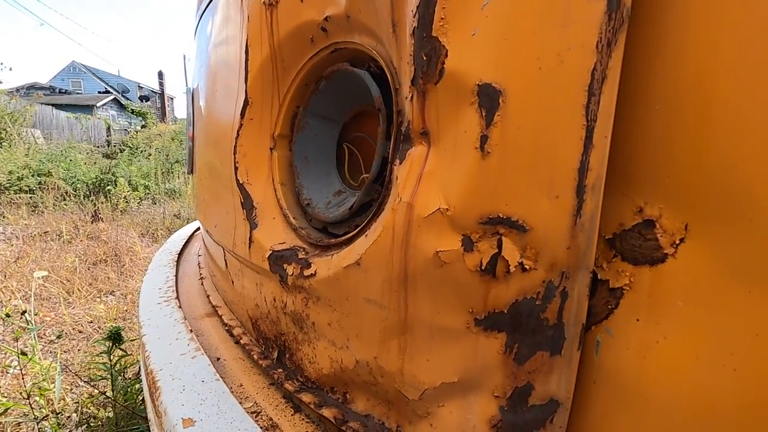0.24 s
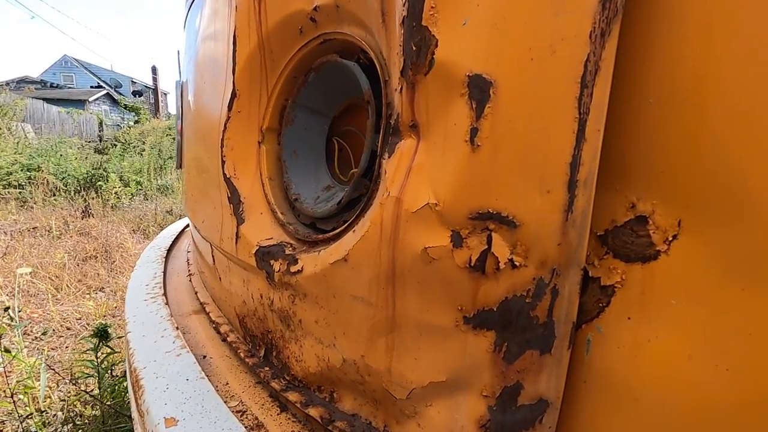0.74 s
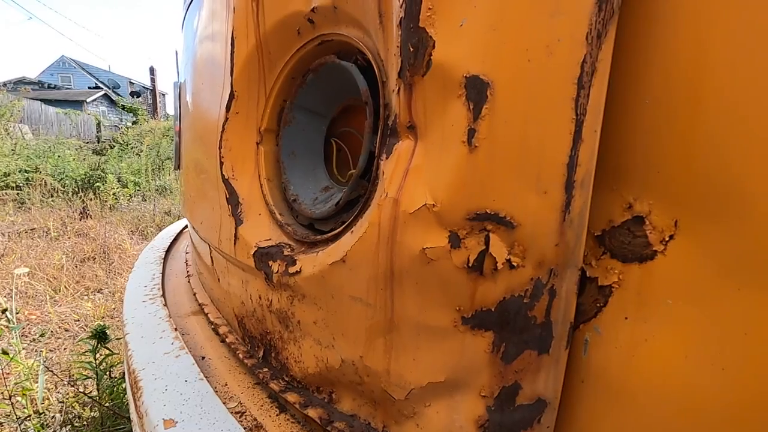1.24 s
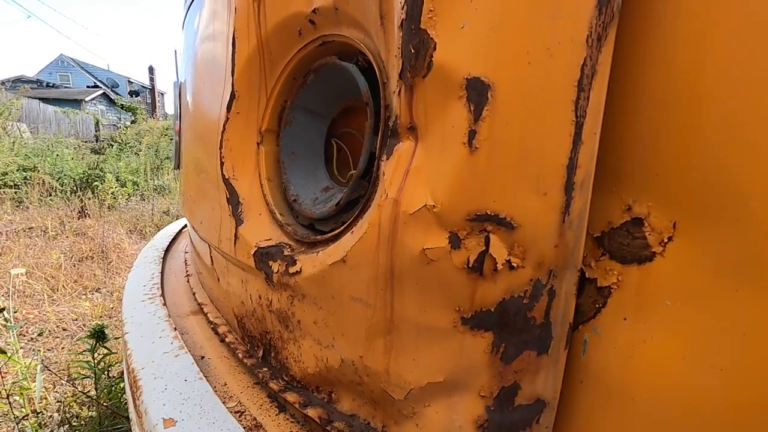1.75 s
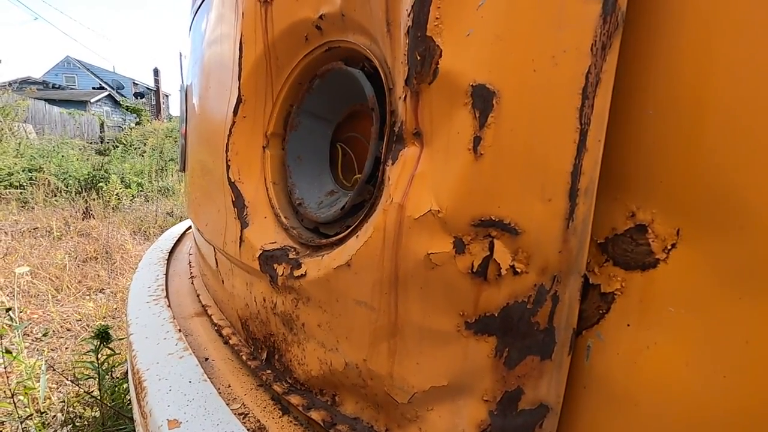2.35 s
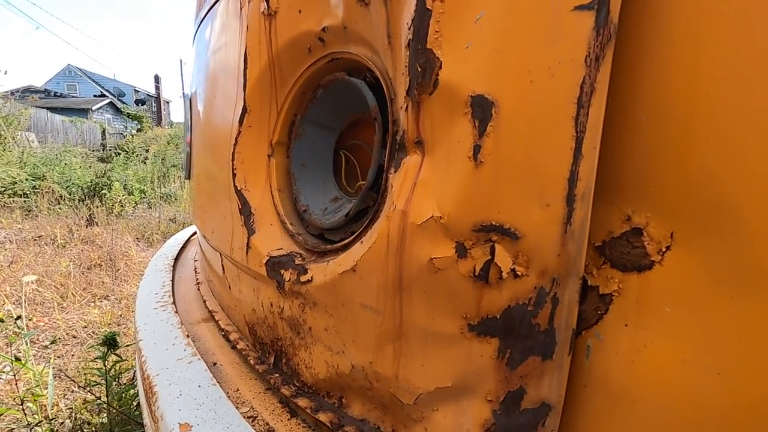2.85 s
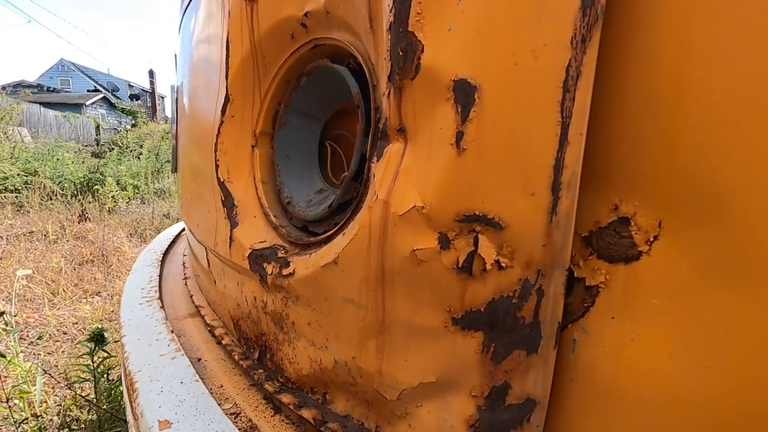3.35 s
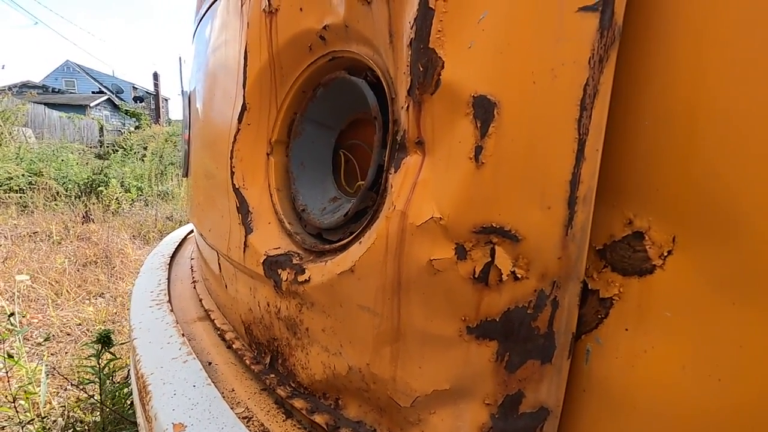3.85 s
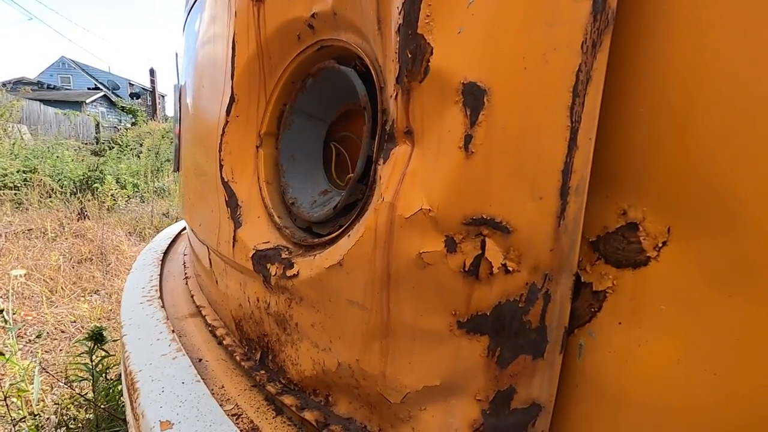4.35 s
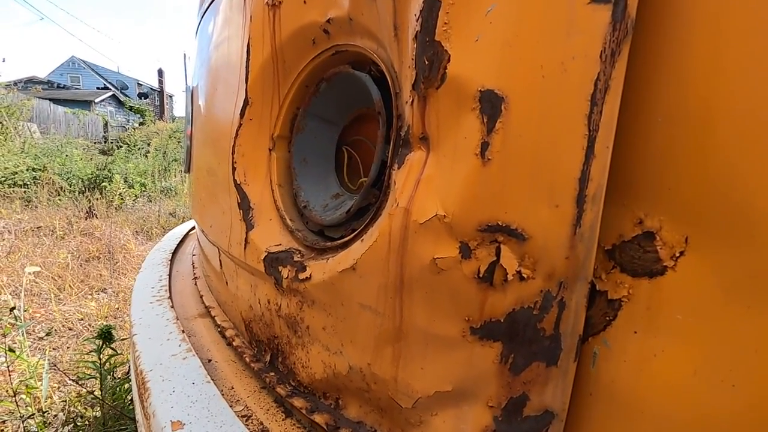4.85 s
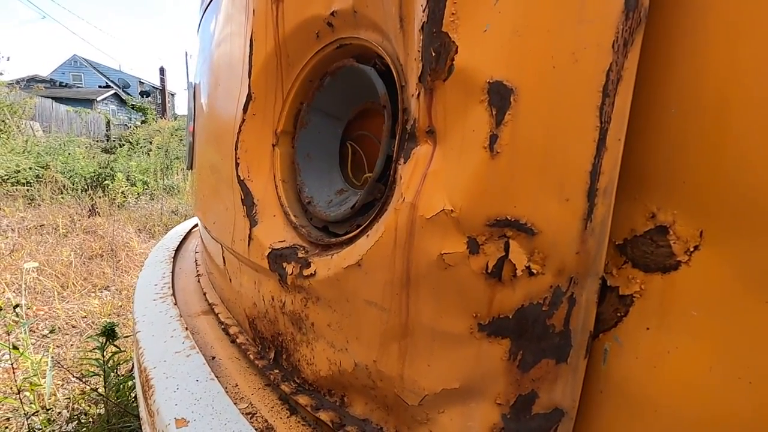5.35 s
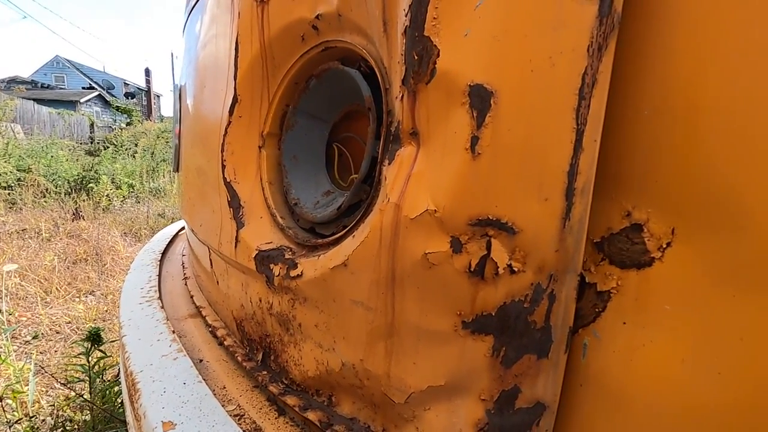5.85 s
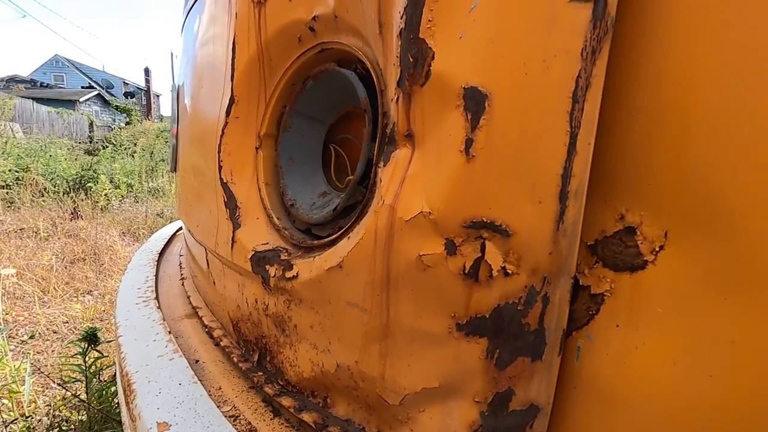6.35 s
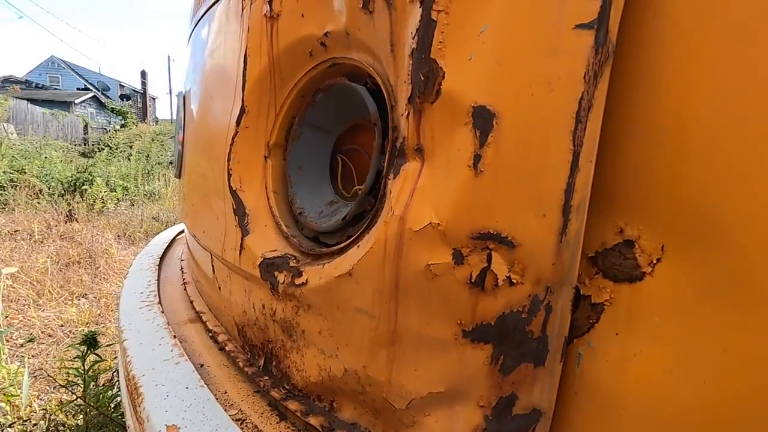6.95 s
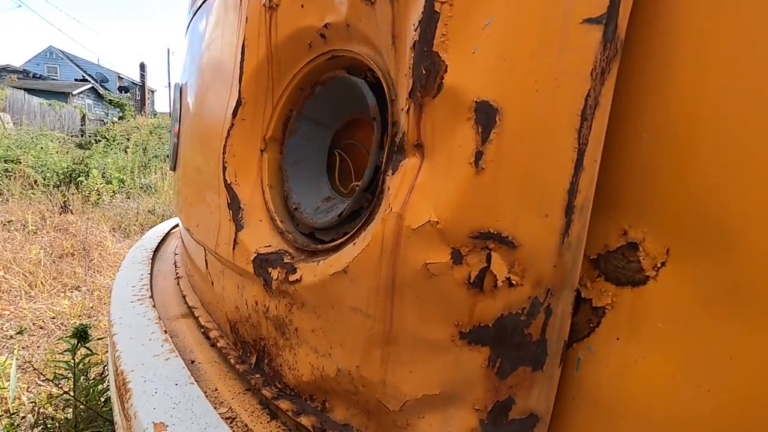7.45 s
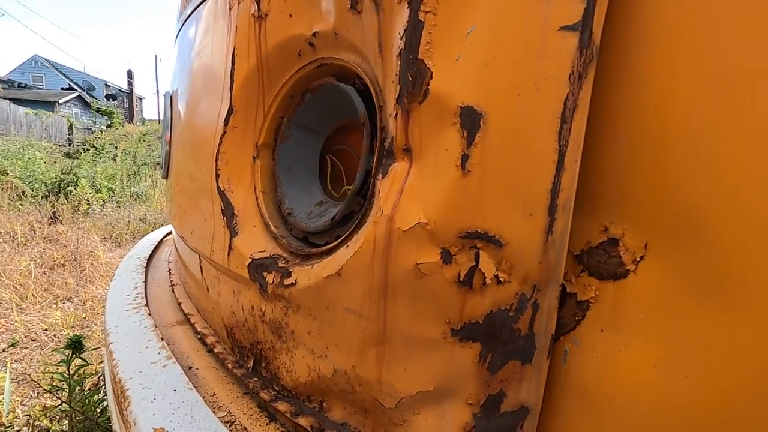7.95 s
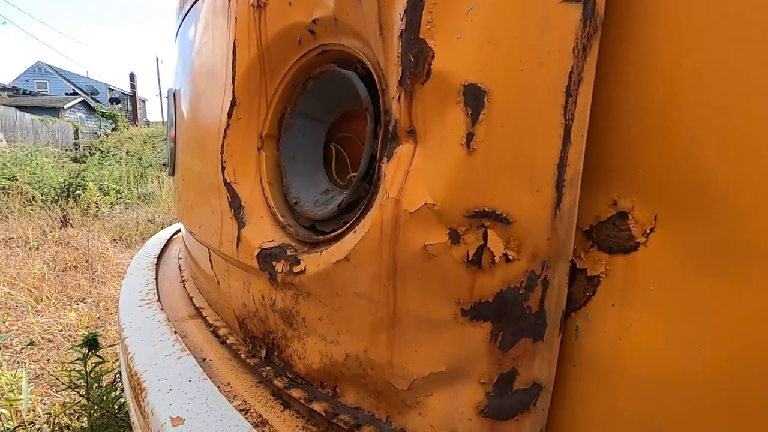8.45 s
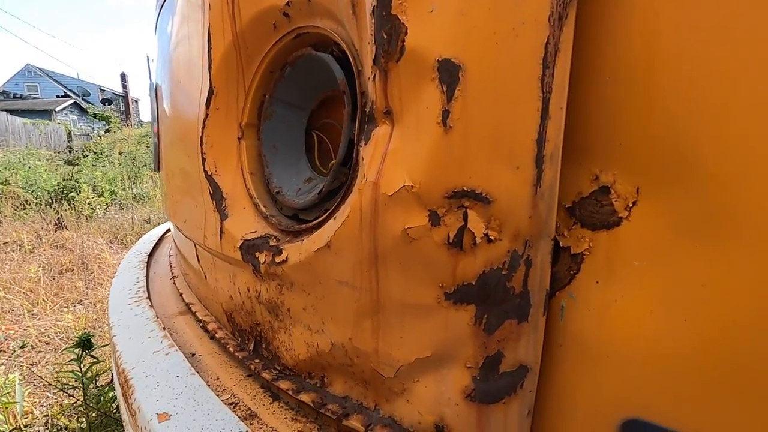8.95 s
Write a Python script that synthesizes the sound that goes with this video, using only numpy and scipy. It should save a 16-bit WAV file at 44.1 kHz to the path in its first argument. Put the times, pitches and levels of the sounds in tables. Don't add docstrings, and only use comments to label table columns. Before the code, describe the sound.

A hand-pumped hydraulic jack clicks and thumps against a dented steel panel in slow strokes, over insect buzz and distant road rumble.

```python
import sys
import numpy as np
from scipy import signal
from scipy.fft import rfft, irfft, next_fast_len
from scipy.io import wavfile
from scipy.ndimage import uniform_filter1d

SR = 44100
rng = np.random.default_rng(int(sys.argv[2]) if len(sys.argv) > 2 else 0)


def level_to_linear(level):
    exponent = np.asarray(level, float) / 20
    return 10 ** exponent


def store_wav(level_fs):
    pcm = np.round(np.clip(np.atleast_2d(level_fs), -1, 1) * 32767)
    wavfile.write(sys.argv[1], SR, pcm.T.astype(np.int16))


N = 406161
LAG = 2


def evened(x):
    return x / np.sqrt(np.mean(x ** 2) + 1e-20)


def read(points, hz):
    f, value = np.transpose(points)
    return np.interp(np.log(hz + 1), np.log(f + 1), value)


def curve(rows, column):
    rows = np.array(rows)
    return np.interp(np.arange(N) / SR, rows[:, 0], rows[:, column])


def add(mix, s, sound):
    part = mix[:, round(s * SR):][:, :sound.shape[1]]
    part += sound[:, :part.shape[1]]


def resonate(x, hz, width):
    turn = np.exp(2j * np.pi * np.cumsum(hz * np.ones(x.shape[-1])) / SR)
    r = np.exp(-np.pi * width / SR)
    return 2 * (turn * signal.lfilter([1 - r], [1, -r], x / turn)).real


def coloured(x, gain):
    n = next_fast_len(x.shape[-1])
    return irfft(rfft(x, n) * gain(np.fft.rfftfreq(n, 1 / SR)), n)[..., :x.shape[-1]]


def ring(modes, t):
    hz, db, t60 = np.transpose(modes)[:, :, None]
    db = db + 2 * rng.standard_normal(db.shape)
    return (level_to_linear(db - 60 * t / t60) * np.sin(2 * np.pi * hz * t)).sum(0)


def near(x):
    return np.array([np.roll(x, LAG), x])


def wash(spectrum, patchy_db):
    # (frequency [Hz], left-right likeness [0..1])
    likeness = [(60, .985), (290, .97), (640, .72), (1410, .76), (3100, .55), (6000, .1)]
    # (frequency [Hz], left minus right [dB])
    balance = [(60, 0), (250, -.5), (700, 1), (1300, 2.5), (2400, 3), (4400, 1.5), (8000, .5)]
    hz = np.fft.rfftfreq(2048, 1 / SR)[:, None]
    a, b, c, d, patches = rng.standard_normal((N // 512 + 5, 1025, 5)).T
    patches = uniform_filter1d(patches, size=20, axis=0)
    patches = evened(uniform_filter1d(patches, size=6, axis=1))
    same = np.clip(read(likeness, hz), 0, 1)
    lean = level_to_linear(read(balance, hz) / 2)
    left = a + 1j * b
    right = same * left + np.sqrt(1 - same ** 2) * (c + 1j * d)
    z = np.array([left * lean * np.exp(-2j * np.pi * hz * LAG / SR), right / lean])
    z = z * level_to_linear(read(spectrum, hz) + patchy_db * patches)
    return evened(signal.istft(z, nperseg=2048, noverlap=1536)[1][:, :N])


def still_air():
    # (frequency [Hz], density [dB per Hz])
    air_colour = [(150, -41), (400, 6.5), (2000, -3.5), (4500, -7), (5600, -19), (7800, -33), (8600, -62),
                  (12000, -73), (15500, -83)]
    return level_to_linear(-56) * wash(air_colour, patchy_db=2.5)


def far_road():
    # (frequency [Hz], density [dB per Hz])
    rumble_colour = [(15, 0), (30, -9), (48, 4.5), (70, -3), (150, -5), (220, -12), (330, -25.5),
                     (600, -71)]
    tyre_colour = [(300, -27), (550, -6), (800, -2.5), (1100, 1), (1500, -5.5), (2200, -11.5), (3500, -24),
                   (6000, -54)]
    # (time [s], level [dB])
    traffic = [(0, -49.5), (1.0, -54), (1.8, -48), (3.2, -51), (4.2, -48), (6.6, -49), (9.21, -48.5)]
    # (closest [s], tyre wash [dB], fall to half power [s])
    cars = [(1.25, -47.5, 0.37), (3.0, -51, 0.56), (5.499, -50.5, 0.25), (6.2, -47, 0.51), (8.4, -52.5, 1)]
    # (frequency [Hz], gain [dB])
    far_cut = [(9000, 0), (12000, -5), (15000, -20)]
    t = np.arange(N) / SR
    rumble = level_to_linear(curve(traffic, column=1) + 10.0) * wash(rumble_colour, patchy_db=1.5)
    power = level_to_linear(-73.5) ** 2
    for s, db, half in cars:
        power = power + level_to_linear(db) ** 2 / (1 + ((t - s) / half) ** 2)
    tyres = np.sqrt(power) * level_to_linear(1.5) * wash(tyre_colour, patchy_db=1.5)
    return coloured(rumble + tyres, lambda hz: level_to_linear(read(far_cut, hz)))


def far_engine():
    # (time [s], frequency [Hz], level [dB])
    firing = [(0, 106.5, -55), (1.15, 89.4, -43), (1.5, 96.5, -40.5), (2.0, 89.7, -41.5), (2.3, 107, -45),
              (3.7, 94.9, -48.5), (4.5, 106.1, -41.5), (5.8, 106.4, -42), (6.3, 89.94, -49),
              (6.9, 87.36, -41.5), (7.3, 96.16, -48), (8.3, 95.8, -42), (9.21, 94.7, -42.5)]
    # (time [s], frequency [Hz], level [dB])
    hum = [(6.3, 255.2, -63.5), (6.7, 284, -49.5), (7.2, 277.5, -53), (7.6, 296, -58), (8.0, 298, -56),
           (8.4, 298.5, -52.5), (8.8, 309, -58), (9.21, 293, -49)]
    # (multiple of firing [ratio], level [dB])
    orders = [(.5, -12), (1.5, -11)]
    t = np.arange(N) / SR
    noise = rng.standard_normal((2, N))
    waver = evened(uniform_filter1d(noise[0], size=3000))
    firing_hz = curve(firing, column=1)
    uneven = 0
    for multiple, db in [(0.98, 0.009)] + orders:
        uneven = uneven + level_to_linear(db) * evened(resonate(noise[1], multiple * firing_hz, width=2.64))
    start, end, beat_db = 6.36, 7.75, -31
    throb_hz, throb_at_s = 3.81, 6.51
    passing = np.sin(np.pi * np.clip((t - start) / (end - start), 0, 1)) ** 0.1
    throb = passing * np.cos(np.pi * throb_hz * (t - throb_at_s))
    phase = 2 * np.pi * np.cumsum(firing_hz * (1 + 0.033 * waver)) / SR
    drone = level_to_linear(curve(firing, column=2)) * uneven + level_to_linear(beat_db) * throb * np.sin(phase)
    whine_hz = curve(hum, column=1)
    whine = evened(resonate(resonate(noise[1], whine_hz, width=25), whine_hz, width=28))
    return near(drone + whine * level_to_linear(curve(hum, column=2)))


def song_band(noise, hz, width, passes=2):
    for _ in range(passes):
        noise = resonate(noise, hz, width)
    return evened(noise)


def insects():
    # (frequency [Hz], width [Hz], level [dB])
    chorus_bands = [(6210, 940, -24), (6404, 264, 12.5), (6550, 197, 13.5), (7320, 680, 13.5)]
    # (frequency [Hz], width [Hz], rms [dB])
    overtones = [(12900, 900, -91), (14200, 500, -95)]
    # (time [s], chorus [dB], near singer [dB])
    swarm = [(0.0, -50.5, -81), (0.71, -49.5, -58), (1.97, -50, -87), (2.2, -50.5, -59.5),
             (4.95, -48.5, -57.5), (5.28, -50, -61), (5.67, -49, -56.5), (9.21, -47.5, -57)]
    # (part of the phrase [0..1], level [dB])
    wing_strokes = [(.0, -14.5), (.31, 0.5), (.64, 17)]
    # (frequency [Hz], gain [dB])
    song_edges = [(5200, -19.5), (5800, 1), (7900, -12), (8250, -23), (9500, -38), (11500, -82)]
    scrapes = rng.standard_normal((2, N))
    scrapes[1] -= 0.2 * scrapes[0]
    chorus = sum(level_to_linear(db) * song_band(scrapes, hz, w) for hz, w, db in chorus_bands)
    phrase = (np.arange(N) / SR * 31.4) % 1
    strokes = .25 + sum(level_to_linear(db) * np.exp(-((phrase - at - .1) / .07) ** 2) for at, db in wing_strokes)
    files = rng.standard_normal((2, N))
    files[1] += 0.47 * np.roll(files[0], 8)
    singer = strokes * level_to_linear(-6.0) * song_band(files, 7570, 310)
    songs = level_to_linear(curve(swarm, column=1)) * evened(chorus) + level_to_linear(curve(swarm, column=2)) * evened(singer)
    high = sum(level_to_linear(db) * song_band(scrapes, hz, w, passes=3) for hz, w, db in overtones)
    return coloured(songs, lambda hz: level_to_linear(read(song_edges, hz))) + high


def flecks():
    per_s, db = 20, -79.5
    size = level_to_linear(3 * rng.exponential(1, (2, N))) * (rng.random(N) < per_s / SR)
    t = np.arange(900) / SR
    colour = [(6500, -40), (8500, 2.0), (12000, -12.5), (14000, -22)]
    grain = coloured(rng.standard_normal(900), lambda hz: level_to_linear(read(colour, hz)))
    grain = evened(grain) * level_to_linear(-60 * t / 0.029)
    return level_to_linear(db) * signal.oaconvolve(size, grain[None], axes=1)[:, :N]


def tick(db):
    t60 = .055
    t = np.arange(5000) / SR
    colour = [(2500, -40), (5000, 3), (9000, -9.0), (15500, -23.0)]
    flake = rng.standard_normal((3, len(t)))
    flake = coloured(flake[0] + 1.2 * flake[1:], lambda hz: level_to_linear(read(colour, hz)))
    return level_to_linear(db + 3.0 - 60 * t / t60) * evened(flake) * level_to_linear([[-2.5], [2.5]])


def oil(seconds, first_hz, last_hz, db):
    n = round(seconds * SR)
    flow = rng.standard_normal(SR)[:n]
    whistle = evened(resonate(flow, np.linspace(first_hz, last_hz, n), width=50))
    return near(level_to_linear(db) * whistle * signal.windows.tukey(n, .5))


def scrape(seconds, db, treble_db):
    n = round(seconds * SR)
    noise = rng.standard_normal((4, 8000))
    catches = level_to_linear(3.6 * evened(uniform_filter1d(noise[3], size=90)))
    grit = (np.array([np.roll(noise[0], 1), noise[0]]) + 1.1 * noise[1:3]) * catches
    colour = [(800, -26), (1500, 0.5), (3500, -1.0), (5200, -5.5),
              (8500, treble_db - 21.0), (13500, treble_db - 18), (15500, -37)]
    grit = evened(coloured(grit, lambda hz: level_to_linear(read(colour, hz))))[:, :n]
    return level_to_linear(db) * grit * signal.windows.tukey(n, .6) * level_to_linear([[-1.2], [1.2]])


def tap(db):
    t60 = 0.03
    t = np.arange(4000) / SR
    colour = [(200, -32), (450, 2.5), (1500, 0), (2200, -30), (3200, -70)]
    rap = rng.standard_normal(len(t)) * level_to_linear(-60 * t / t60)
    rap = rap + 10.0 * np.exp(-((t - .0012) / 0.000082) ** 2)
    rap = coloured(rap, lambda hz: level_to_linear(read(colour, hz)))
    return near(level_to_linear(db + 2) * rap / abs(rap).max() * (1 - np.exp(-(t / .0006) ** 2)))


def ping(db, hz, t60):
    t = np.arange(4000) / SR
    wobble = 1 + .4 * evened(uniform_filter1d(rng.standard_normal(len(t)), size=120))
    onset = 1 - np.exp(-(t / 0.0013) ** 2)
    return near(level_to_linear(db - 60 * t / t60) * wobble * np.sin(2 * np.pi * hz * t) * onset)


def click(db, treble_db, low_db, voice_hz, rattle_ms, ring_db):
    # (frequency [Hz], level [dB], t60 [s])
    steel_modes = [(2514, -12, .045), (3138, -1, .09), (4463, -10, .05), (4651, -7, .055)]
    # (frequency [Hz], density [dB per Hz])
    crack_colour = [(700, -5), (1200, 9.5), (2500, 2), (4600, 2), (5600, -5.5), (7000, -6.5),
                    (10000, -18.5), (13000, -32), (15500, -53)]
    # (frequency [Hz], width [Hz], level over the crack [dB])
    body_modes = [(950, 43, 1), (1440, 620, 7), (1860, 240, 7), (2350, 120, 4.5), (2690, 150, -1),
                  (3600, 480, 2.5), (4400, 78, -1), (6110, 330, 5)]
    t = np.arange(6000) / SR
    u = t * 1000 / rattle_ms
    touches = level_to_linear(3.2 * evened(uniform_filter1d(rng.standard_normal(len(t)), size=50)))
    rattle = np.minimum(t / 0.00091, 1) * (np.exp(-u ** 3) + 0.29 * level_to_linear(-60 * t / 0.14)) * touches
    knocks = rng.standard_normal((3, len(t))) * rattle
    hz = np.fft.rfftfreq(len(t), 1 / SR)
    apart = read([(2000, .45), (10000, 1.0)], hz)
    lag = read([(4000, LAG), (10000, .8)], hz)
    late = np.exp(-2j * np.pi * np.outer([1, 0], hz * lag) / SR)
    ports = late * rfft(knocks[0]) + apart * rfft(knocks[1:])
    tilt = read([(900, low_db), (1700, low_db), (2300, 0), (5500, 0.011), (8500, treble_db + 26.0)], hz)
    voice = 8.9 * np.exp(-(np.log(hz / voice_hz + 1e-9) / 0.14) ** 2)
    lean = np.outer([-1, 1], read([(5000, 0), (9000, 2.8)], hz))
    struck = 2.5 * rng.standard_normal(len(body_modes))
    struck = struck + 3.2 * np.exp(-(np.log(np.transpose(body_modes)[0] / voice_hz) / 0.12) ** 2)
    body = 1
    for (f, w, lift), more in zip(body_modes, struck):
        body = body + level_to_linear(lift + more) * w / (w + 2j * (hz - f))
    crack = irfft(ports * body * level_to_linear(read(crack_colour, hz) + tilt + voice + lean))
    steel = near(ring(steel_modes, t) * (1 - np.exp(-(t / 0.0014) ** 2)))
    start = slice(0, 300)
    return level_to_linear(db - 2.5) * (crack / crack[:, start].std() + level_to_linear(ring_db) * steel / steel[:, start].std())


def clicks():
    # (time [s], blow [dB], strongest [Hz], ring of the steel [dB], treble [dB])
    lifts = [(0.5055, -37, 3420, -7, -16), (0.537, -34, 3340, -22, -20), (1.3223, -33.5, 2330, -15, -18),
             (1.3468, -38.5, 2270, -25, -18), (2.0937, -35, 1340, -8, -17), (2.1204, -40.5, 2150, -8, -19),
             (2.9974, -38, 3050, -12, -21), (3.027, -39, 2130, -11, -19), (3.9051, -36, 4270, -14, -22),
             (3.931, -33, 5040, -27, -14), (4.7225, -34.5, 4300, -10, -15), (4.7485, -33.5, 4530, -12, -13),
             (5.8401, -37, 4550, -19, -15), (5.8701, -38.5, 3100, -13, -13), (7.015, -41, 4500, -10, -19),
             (7.0447, -34, 1490, -18, -23)]
    rattles = [(0.4614, -56, 2390, -5, -28), (0.7672, -40.5, 3120, -23, -18), (1.5773, -42, 4140, -22, -10),
               (1.7614, -39, 4330, -22, -12), (2.374, -41, 2600, -19, -15), (2.788, -45.5, 3750, -39, -16),
               (3.2879, -50, 1900, -12, -5), (3.5523, -49, 1890, -23, -22), (4.142, -42.5, 2600, -22, -20),
               (4.9663, -41, 3930, -26, -15), (7.236, -36.5, 5200, -26, -18)]
    clunks = [(1.0112, -29.5, 950, -22, -19.5)]
    # (time [s], blow [dB], strongest [Hz], ring [dB])
    stops = [(0.7235, -49, 3400, -18), (0.7905, -34, 1500, -12), (1.528, -46, 1980, -14),
             (1.6028, -38, 1580, -6), (2.399, -37.5, 2350, -10), (3.174, -48, 2000, -19),
             (3.302, -43.5, 2590, -32), (3.314, -36.5, 2580, -8), (4.1573, -40.5, 2620, -18),
             (4.1687, -28.5, 2750, -10), (4.997, -32.5, 2350, -6), (6.0926, -45, 2610, -11),
             (6.104, -38.5, 2500, -8), (6.927, -46.5, 4460, -17), (6.993, -46, 3763, -26),
             (7.2528, -45, 4170, -21), (7.267, -39, 2440, -8)]
    dull_stops = [(*row, -44) for row in stops]
    # rows, low-mid dB re blow, rattle length ms
    kinds = [(lifts, -5, 6.4), (rattles, -1.5, 5.1), (clunks, 1.4, 5.8), (dull_stops, -6, 7.9)]
    blows = []
    for rows, low_db, ms in kinds:
        for s, db, hz, ring_db, treble_db in rows:
            blows.append((s, db, treble_db, low_db, hz, ms, ring_db))
    return sorted(blows)


def thump(db, hz, push_ms, slap_db):
    # (frequency [Hz], level [dB], t60 [s])
    panel_modes = [(103, 12.5, 0.055), (203, 9.5, 0.11), (254, 9.5, 0.1), (293.5, 2.5, 0.32),
                   (317, 0.5, 0.28), (345, -10.5, 0.96), (410, -3.5, 0.29), (477, -3, 0.21),
                   (585, -8, 0.023), (661, -1.5, 0.1), (734, -4, 0.14)]
    # (frequency [Hz], density [dB per Hz])
    slap_colour = [(300, 0), (520, 11.5), (900, 0), (1600, -2.5), (2400, -45)]
    t = np.arange(9000) / SR
    u = np.clip(t * 1000 / push_ms, 0, 1)
    early = 1.5 * np.exp(-t / 0.00044)
    push = -np.cos(2 * np.pi * hz * (t - .005) - early) * np.sin(np.pi * u ** 0.69) ** 1.85
    after = level_to_linear(-19.5) * ring(panel_modes, t) * (1 - np.exp(-(t / 0.0035) ** 2))
    swing = np.r_[push + after, np.zeros(200)]
    swing = coloured(swing, lambda hz: level_to_linear(read([(1500, 0), (4000, -50)], hz)))
    swing = np.array([np.roll(swing, LAG + 2), swing])[:, :len(t)] * level_to_linear([[-0.55], [0.55]])
    skin = rng.standard_normal((3, len(t)))
    skin = near(skin[0]) + 0.28 * skin[1:]
    skin = evened(coloured(skin, lambda hz: level_to_linear(read(slap_colour, hz))))
    decay = level_to_linear(-60 * t / 0.054) + 0.11 * level_to_linear(-60 * t / 0.34)
    slap = level_to_linear(slap_db) * skin * (1 - np.exp(-(t / 0.001) ** 2)) * decay
    return level_to_linear(db + 0.5) * (swing + slap) * (1 - (t / t[-1]) ** 4)


def thumps():
    # (time [s], peak [dB], pitch [Hz], rebound re blow [dB], rebound after [s])
    shoves = [(0.7987, -17.5, 280, -26, .039), (1.6093, -15.5, 293, -29, 0.028),
              (2.408, -16, 282, -13.5, 0.03), (3.323, -14.5, 290, -18, .028), (4.178, -14, 294, -16, 0.033),
              (5.008, -19, 297, -13, .031), (6.115, -15.5, 314, -17, 0.043), (7.28, -24.5, 316, -22, 0.041)]
    # (time [s], peak [dB], pitch [Hz], length of the push [ms])
    nudges = [(0.083, -35, 262, 25), (0.421, -37, 354, 4.8), (0.536, -39, 336, 29), (1.014, -35, 275, 18),
              (1.346, -42, 345, 36), (1.957, -43, 239, 12), (2.122, -41, 332, 29), (2.916, -34, 334, 15),
              (3.03, -31.5, 255, 12), (3.932, -35.5, 330, 20), (3.935, -39, 530, 13), (4.751, -43, 540, 19),
              (5.361, -39, 220, 44), (4.749, -32, 293, 13), (5.253, -35.5, 318, 30),
              (5.488, -36.5, 332, 9.4), (5.871, -34.5, 322, 18), (6.277, -35, 312, 27),
              (7.048, -34, 288, 15.7), (8.624, -30, 238, 10)]
    pushes = [(*row, -12) for row in nudges]
    for s, db, hz, back_db, after in shoves:
        pushes.append((s, db, hz, 13.9, -16))
        pushes.append((s + after, db + back_db, hz * 1.06, 22, -16))
    return sorted(pushes)


def scene():
    # (time [s], peak [dB])
    ticks = [(0.2713, -68), (0.4299, -66), (1.7195, -68), (2.2822, -72), (2.8474, -61), (3.7509, -66),
             (4.143, -51.5), (4.476, -56.5), (4.7017, -77), (5.2305, -65), (5.3428, -62), (5.405, -59),
             (6.0702, -61), (6.3011, -66), (6.559, -64), (6.8324, -70), (7.368, -51), (7.806, -65),
             (8.3903, -67), (8.4422, -67), (8.7061, -65)]
    # (start [s], end [s], first [Hz], last [Hz], level [dB])
    oil_flows = [(.15, 0.451, 3780, 3920, -84), (1.824, 2.1, 3960, 3930, -71.5),
                 (2.142, 2.358, 3640, 3600, -77), (2.446, 2.78, 3800, 3750, -77),
                 (3.445, 3.88, 3700, 4070, -72), (6.4, 6.903, 3870, 3800, -71)]
    # (start [s], end [s], level [dB], treble [dB])
    slides = [(0.153, 0.29, -89, 2), (0.483, 0.564, -50, -4), (0.756, 0.778, -58, 7), (1.309, 1.36, -49, 3),
              (1.562, 1.597, -52, -5), (1.75, 1.795, -57, -2), (2.081, 2.124, -49, -15),
              (2.636, 2.705, -68, 5), (2.965, 3.05, -59, -7), (3.274, 3.335, -59, 5),
              (3.883, 3.94, -50.5, 1), (4.13, 4.17, -59, -9), (4.383, 4.435, -59.5, -4),
              (4.708, 4.77, -47.5, 6), (4.959, 4.999, -53, -12), (5.309, 5.44, -60, -7),
              (5.832, 5.884, -45, -4), (6.07, 6.113, -54, -7), (6.997, 7.078, -50, -4),
              (7.213, 7.285, -60, -3)]
    # (time [s], peak [dB])
    taps = [(0.078, -34), (2.913, -26.5), (8.629, -35)]
    # (time [s], peak [dB], frequency
    # [Hz], t60 [s])
    pings = [(0.795, -45, 4470, 0.087), (2.1, -52, 4651, .06), (2.403, -48.5, 4651, 0.081),
             (2.789, -45, 3900, 0.057), (3.32, -50, 4651, .06), (3.935, -39, 4463, .05),
             (4.171, -38, 4400, 0.06), (4.172, -37, 4651, .07), (4.733, -43, 4463, .04),
             (4.751, -38, 4440, 0.07), (4.751, -47, 6110, .025),
             (0.079, -40, 1140, 0.033), (0.079, -34, 1410, 0.024), (0.508, -43, 1900, .02),
                     (0.5345, -42, 2150, .012), (0.5373, -28.5, 1560, 0.023), (0.7915, -38, 1420, .025),
                     (1.011, -38, 1820, 0.013), (1.323, -36, 1356, .02), (1.604, -30, 1570, 0.024),
                     (2.095, -32, 1335, .025), (2.121, -37, 1980, 0.022), (2.914, -29, 543, .03),
                     (2.996, -34, 1500, .02), (3.029, -29, 1430, .02), (3.315, -35, 1520, .025),
                     (3.907, -32, 1560, 0.026), (3.932, -33, 1184, 0.046), (4.143, -45, 1280, .02),
                     (4.1764, -34, 1360, .02), (4.723, -36, 1950, .025), (4.724, -38, 1080, .025),
                     (4.749, -33, 1970, .025), (5.846, -34, 1550, 0.024), (5.872, -35, 1720, .02),
                     (7.0225, -32, 1500, .025), (7.015, -42, 2450, .015), (7.015, -43, 3500, .015),
                     (7.022, -46, 4400, .02), (7.047, -32, 560, 0.032), (7.048, -35, 2030, .02),
                     (7.237, -33, 4030, .015), (7.269, -33, 1590, 0.026), (2.787, -47, 3600, .02),
                     (2.788, -44, 4040, .02), (4.1698, -33, 2820, .018), (4.170, -26, 2450, 0.027),
                     (4.998, -44, 4280, 0.018), (6.105, -43, 3600, .02), (6.106, -47, 4400, .02),
                     (7.253, -44, 2650, .015), (0.42, -38, 557, 0.036), (4.967, -39, 5300, .02),
                     (5.845, -38, 4640, .035), (5.871, -48, 3150, 0.036), (5.871, -34, 600, .02),
                     (2.123, -43, 3138, .07), (1.324, -41, 2340, .02), (1.348, -39, 2350, .02),
                     (3.933, -44, 4950, .02), (2.914, -38, 1600, .015)]
    mix = still_air() + far_road() + far_engine() + insects() + flecks()
    for s, db in ticks:
        add(mix, s, tick(db))
    for start, end, *row in oil_flows:
        add(mix, start, oil(end - start, *row))
    for start, end, *row in slides:
        add(mix, start, scrape(end - start, *row))
    for s, db in taps:
        add(mix, s, tap(db))
    for s, *row in pings:
        add(mix, s, ping(*row))
    for s, *row in clicks():
        add(mix, s, click(*row))
    for s, *row in thumps():
        add(mix, s - .0022, thump(*row))
    return mix


def roll_off(x):
    return signal.sosfilt(signal.butter(12, 15700, fs=SR, output="sos"), x)


def record(dry):
    limited = coloured(dry, lambda hz: level_to_linear(read([(15000, 0), (15650, -9), (15800, -70)], hz)))
    return roll_off(limited)


dry = scene()
out = record(dry)
store_wav(out)
```